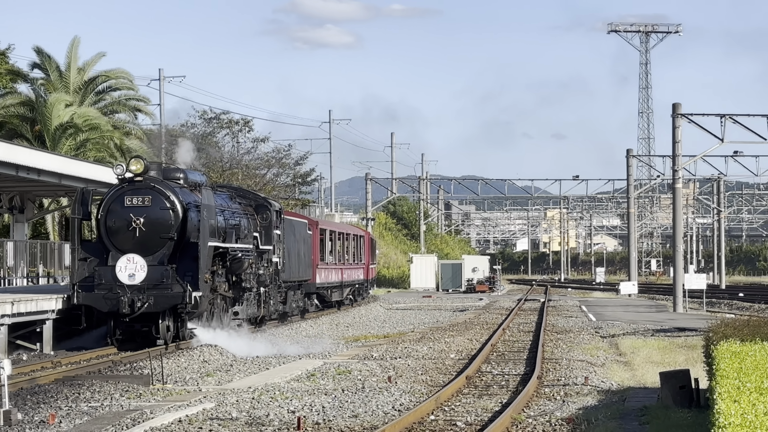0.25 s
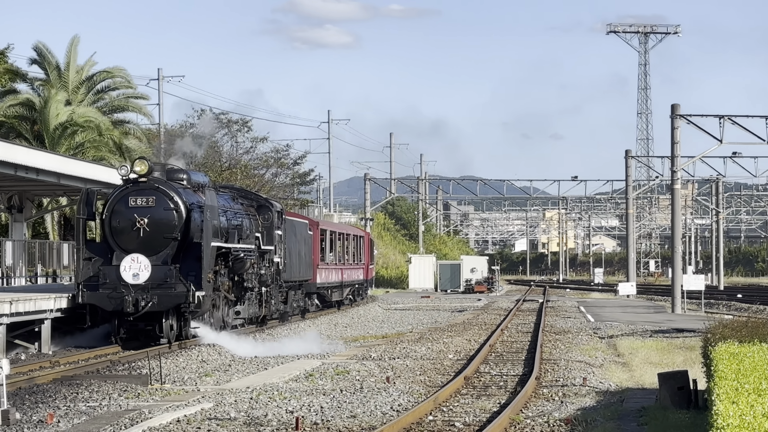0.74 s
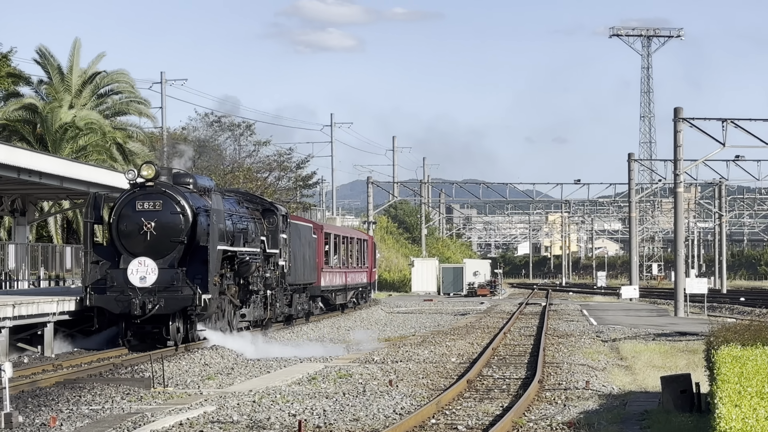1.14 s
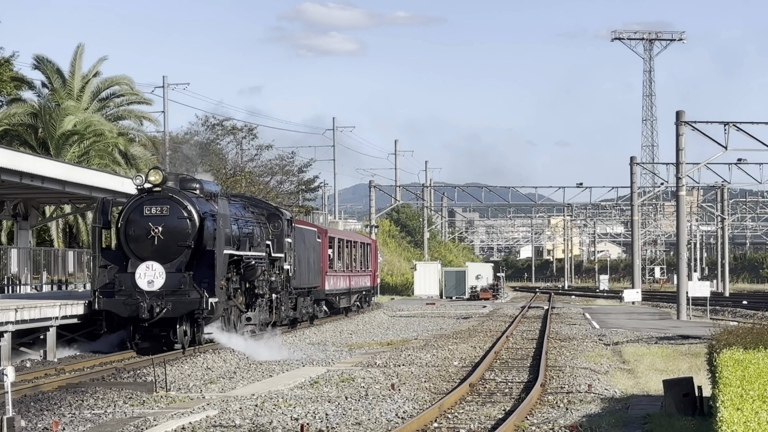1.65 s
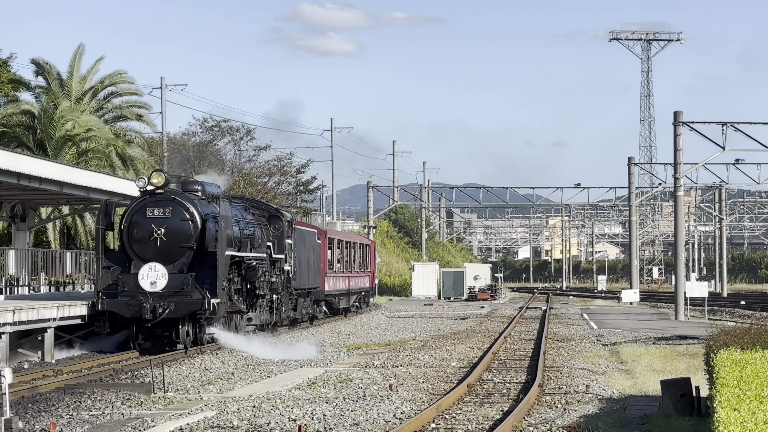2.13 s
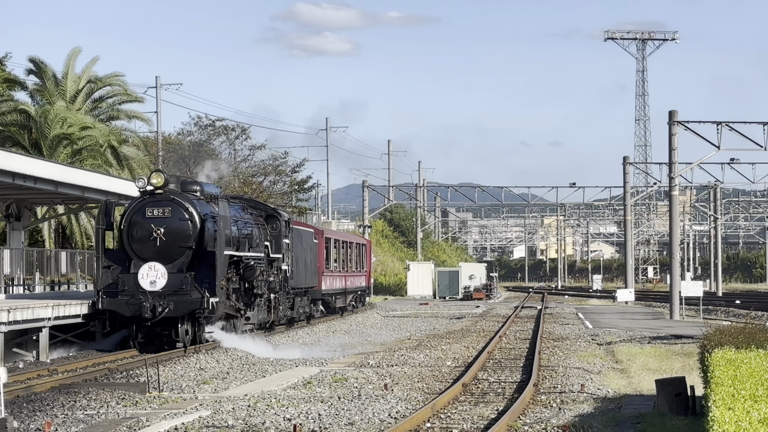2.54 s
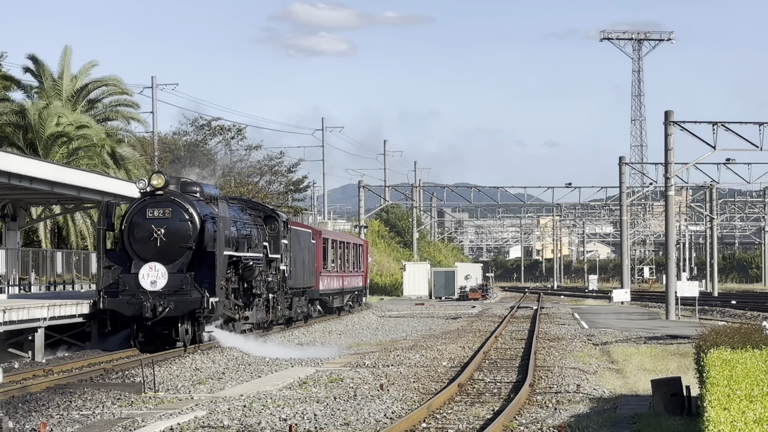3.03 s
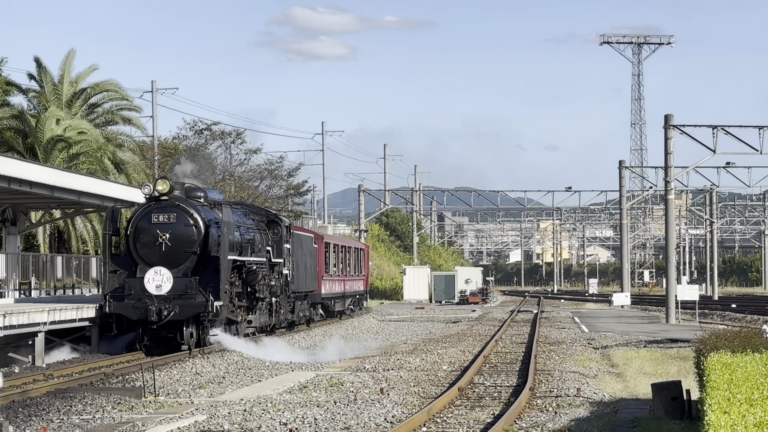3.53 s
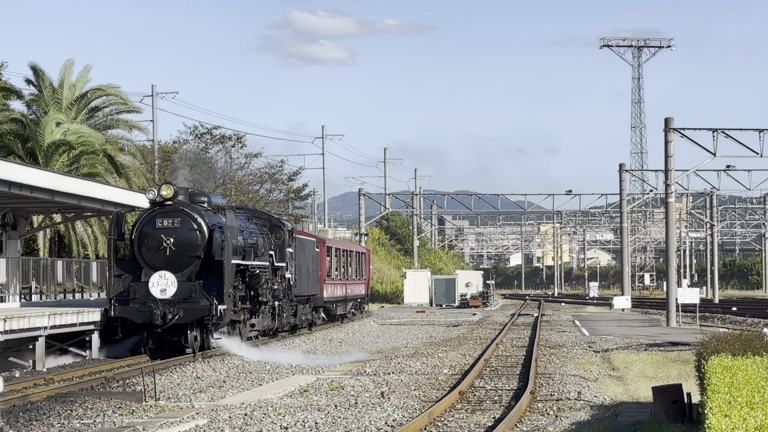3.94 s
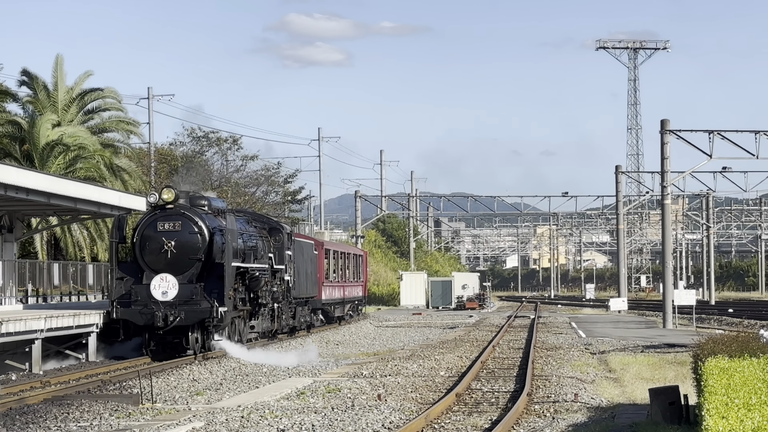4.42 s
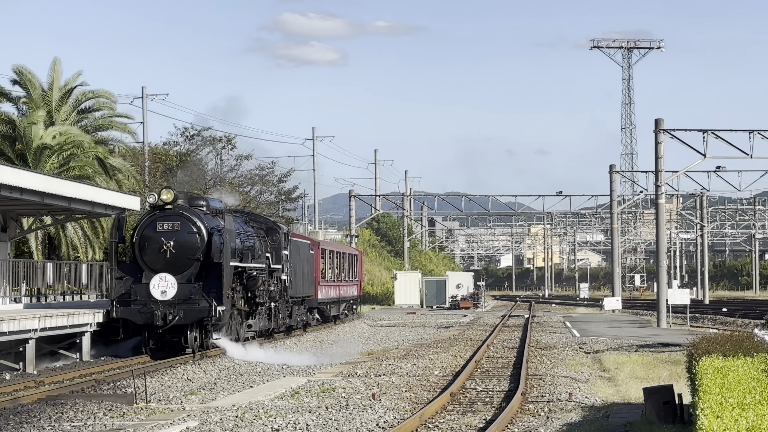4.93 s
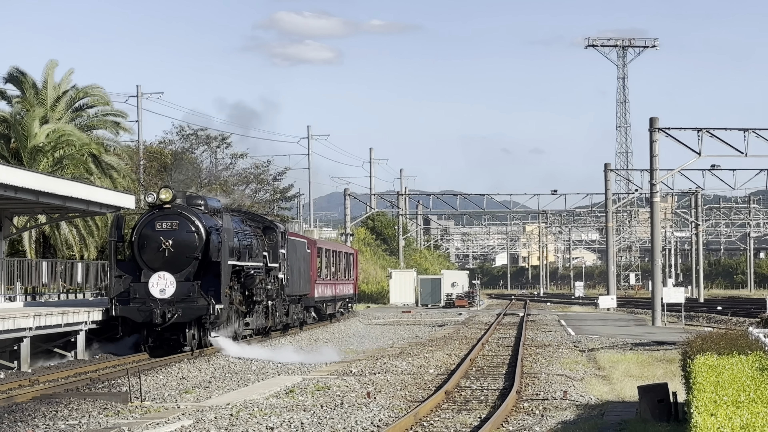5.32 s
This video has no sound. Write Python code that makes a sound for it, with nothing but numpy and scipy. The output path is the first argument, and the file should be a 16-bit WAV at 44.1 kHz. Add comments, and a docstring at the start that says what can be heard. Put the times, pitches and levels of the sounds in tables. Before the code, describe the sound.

Heard from across the tracks in an open station yard, steam escapes in an unbroken hiss, rich in upper mids and treble, gently uneven. Soft, irregular wind knocks give way to a calmer middle with one barely audible distant chirp, then heavy low gusts buffet the unprotected stereo microphone until the cut. A dim, even rumble stays underneath.

```python
"""A standing steam locomotive vents steam from its cylinder cocks, heard across the tracks of a station yard.
The jet is shaped noise: a steady hiss with brief spurts of fine spray, its tone bands swelling and sinking.
A breeze thumps on the microphone in ever stronger gusts: sharp pushes of air, small eddies and a deep wake.
Behind them lie a low rumble, made of dark noise, and one faint, far chirp, a sine that slides down."""
import sys
import numpy as np
from scipy import signal
from scipy.fft import rfft, irfft
from scipy.io import wavfile
from scipy.ndimage import uniform_filter1d

SR = 44100
rng = np.random.default_rng(int(sys.argv[2]) if len(sys.argv) > 2 else 0)


def unload_audio(sound):
    """Save the sound as a 16-bit wav file, at the path given as the first command line argument."""
    columns = np.transpose(np.atleast_2d(sound))
    # keep every value between -1 and 1, then stretch to whole-number steps
    steps = np.round(np.clip(columns, -1, 1) * 32767)
    wavfile.write(sys.argv[1], SR, steps.astype(np.int16))


N = 245725  # length in samples

# Large eddies of wind that thump on the microphone. Each row: time in seconds, level in dB,
# frequency in Hz that sets the range of its tones, roughness from 0 (one sharp push) to 1 (all flurry).
EDDIES = [(.004, -33, 110, .4), (0.033, -33, 140, 0.4), (0.064, -31, 190, 0.5), (.075, -21.5, 140, 0.2),
          (.324, -35, 280, 0.6), (.485, -33, 150, 0.46), (.709, -33, 310, 0.35), (.722, -27, 330, .45),
          (.738, -26, 350, .45), (0.751, -22, 320, 0.42), (.776, -23.5, 180, 0.35), (.845, -34, 340, 0.36),
          (.865, -31.5, 260, 0.4), (0.959, -32.5, 230, 0.4), (.995, -32, 220, .5), (1.100, -27.5, 400, 0.3),
          (1.116, -26, 260, .4), (1.425, -34, 260, 0.4), (1.444, -26, 190, 0.4), (1.463, -22, 215, 0.15),
          (1.556, -24.5, 235, .3), (1.567, -28, 225, .4), (2.025, -32.5, 300, 0.7),
          (2.041, -28.5, 342, 0.4), (2.099, -27.5, 219, 0.38), (2.185, -28, 380, .5),
          (2.204, -24.5, 220, 0.38), (2.308, -35, 280, 0.56), (2.466, -25.5, 305, 0.42),
          (2.581, -29, 169, 0.3), (2.598, -24, 236, 0.34), (2.725, -33.5, 360, .4), (3.179, -31, 260, 0.6),
          (3.230, -35, 220, 0.45), (3.322, -36, 280, 0.6), (3.596, -24.5, 230, 0), (3.61, -19, 314, 0.52),
          (3.622, -15, 161, 0.2), (3.642, -25, 230, 0.2), (3.661, -23, 258, 0.45), (3.675, -22, 220, 0.2),
          (3.79, -19, 250, 0.42), (3.820, -17, 170, 0.4), (3.832, -13, 297, .35), (3.847, -11.5, 232, 0.47),
          (3.869, -14, 262, 0.6), (3.886, -18.5, 211, 0.55), (3.899, -15.5, 270, 0.4),
          (3.948, -18.5, 320, 0.37), (3.962, -17.5, 268, .45), (3.982, -28, 220, 0.5),
          (4.169, -25.5, 230, 0.65), (4.185, -23, 220, 0.63), (4.225, -29.5, 288, 0.64),
          (4.274, -17, 290, 0.25), (4.298, -29, 230, 0.6), (4.325, -31, 240, 0.4), (4.357, -30, 170, 0.44),
          (4.400, -29.5, 226, 0.32), (4.550, -20, 332, 0.4), (4.563, -17, 282, 0.48),
          (4.59, -22, 500, 0.56), (4.603, -16, 395, 0.4), (4.618, -21.5, 420, 0.5),
          (4.630, -21.5, 390, 0.37), (4.648, -24.5, 300, 0.53), (4.717, -19.5, 356, .4),
          (4.732, -18, 280, 0.54), (4.788, -20, 160, 0.3), (4.802, -22.5, 229, 0.44),
          (4.923, -15, 310, 0.31), (4.947, -20.5, 338, 0.5), (4.964, -24.5, 320, .45),
          (5.027, -28, 240, 0.4), (5.067, -24, 258, 0.37), (5.079, -22, 342, 0.34), (5.127, -24, 240, 0.6),
          (5.212, -12, 240, 0.42), (5.228, -10.5, 406, 0.17), (5.245, -18, 75, 0.35),
          (5.295, -23, 450, 0.54), (5.303, -13.5, 360, 0.14), (5.328, -13, 362, 0.3), (5.337, -22, 80, 0.4),
          (5.371, -18, 340, 0.23), (5.383, -21, 290, 0.5), (5.391, -17, 70, .3), (5.459, -14, 300, 0.4),
          (5.471, -12, 374, 0.2), (5.477, -9, 270, 0.3), (5.490, -5, 365, 0.17), (5.494, -10, 95, .2),
          (5.507, -17, 240, 0.4), (5.523, -19.5, 310, .3), (5.550, -25, 220, .5)]


def amp(db):
    """Turns decibels into a gain."""
    return 10 ** (np.asarray(db) / 20)


def unit(x):
    """Scales a signal to an rms (average strength) of 1."""
    return x / np.sqrt(np.mean(x ** 2) + 1e-20)


def read(points, hz):
    """Reads a curve of (Hz, value) points, with straight lines between them on a log-frequency axis."""
    f, value = np.transpose(points)
    return np.interp(np.log(hz + 1), np.log(f + 1), value)


def add(mix, s, sound):
    """Mixes a stereo sound in at time s, or at the very start if s is negative."""
    start = max(round(s * SR), 0)
    part = mix[:, start:][:, :sound.shape[1]]
    part += sound[:, :part.shape[1]]


def grid(size):
    """Gives the frame times (s) and bin frequencies (Hz) of short-time spectra, four frames to a window."""
    hop = size // 4
    times = np.arange(N // hop + 5) * hop / SR
    return times, np.fft.rfftfreq(size, 1 / SR)


def drift(shape, size):
    """Makes smooth random ups and downs of rms 1, in patches of size (frames, bins)."""
    noise = rng.standard_normal(shape)
    along_time = uniform_filter1d(noise, size[0], axis=0)
    return unit(uniform_filter1d(along_time, size[1], axis=1))


def steam(patchy_db=0.33, flutter_db=0.37, spit_db=0.27, grain_db=2.28, ripple_db=1.28, wander_db=1.26):
    """Turbulent jet: its registers swell and sink, and water in the steam makes the top sputter."""
    level = -26  # dB
    # Average tone colour of the jet. Each row: frequency in Hz, relative level in dB per Hz.
    hiss = [(600, -17), (1300, -10.7), (1550, -7), (1800, -2.2), (2300, -1.8), (2900, .5), (4600, -3.8),
            (5900, 0), (7400, -.6), (8900, -6), (10900, -5.3), (11700, -7.7), (13200, -6.2), (15500, -11.5)]
    # Faint whistles within the hiss. Each row: frequency in Hz, width in Hz, rise over the hiss in dB.
    whistles = [(5882, 40, 2.8), (8095, 90, 1.5)]
    # Frequencies in Hz where the low body, roar, bright sizzle and fizz (fine spray) each rule.
    zones_hz = [1700, 2960, 6100, 12400]
    # Rise and fall of these four registers. Each row: time in seconds, level in dB (its average is removed).
    body = [(0, -41.5), (.45, -42), (1.0, -41), (1.15, -44), (2.1, -40.5), (2.45, -42), (3.1, -41),
            (3.55, -37.5), (3.95, -40.5), (4.28, -47), (4.6, -39.5), (4.78, -44.5), (5.15, -46.5),
            (5.57, -44)]
    roar = [(0, -30), (.3, -30), (.48, -28), (.7, -29.5), (1.0, -29), (1.14, -30), (1.3, -28), (1.5, -30),
            (1.7, -28.4), (1.9, -31), (2.1, -28.5), (2.55, -33), (2.72, -29.5), (3.1, -32), (3.35, -29),
            (3.65, -29), (4.05, -32.5), (4.22, -30.5), (4.78, -36), (5.0, -32.5), (5.38, -36.5),
            (5.57, -36)]
    sizzle = [(.04, -27.5), (.3, -32), (.52, -29), (.73, -31.5), (.82, -30.5), (1.0, -28), (1.15, -30),
              (1.8, -28), (2.0, -30.5), (2.45, -30), (2.63, -33), (2.72, -29.5), (2.85, -30), (2.93, -34.5),
              (3.3, -30.5), (3.48, -32.5), (3.65, -29.5), (4.3, -33), (4.72, -33.5), (4.86, -33),
              (5.25, -35), (5.39, -38.3), (5.57, -36)]
    fizz = [(0, -42.5), (.62, -40), (.9, -40), (1.12, -44.5), (1.25, -38), (1.5, -43.5), (2.15, -38.5),
            (2.9, -44.5), (3.6, -41.5), (4.35, -46), (4.75, -48), (5.05, -43), (5.36, -47.5), (5.57, -47)]
    # Brief spurts of spray. Each row: middle in seconds, length in seconds, rise of the fizz in dB.
    spurts = [(0.04, 0.34, 10.5), (0.784, 0.087, 6), (0.975, 0.18, 10), (3.0, 0.033, 5)]

    t, hz = grid(size=1024)
    field_db = read(hiss, hz)
    for f, width, db in whistles:
        field_db = field_db + db / (1 + (2 * (hz - f) / width) ** 2)

    spurt_db = sum(db / (1 + (2 * (t - middle) / length) ** 4) for middle, length, db in spurts)
    registers = [body, roar, sizzle, fizz]
    # each row of the identity picks one zone, so a register fades out towards its neighbours
    for zone, curve, lift_db in zip(np.eye(len(registers)), registers, [0, 0, 0, spurt_db]):
        level_db = (np.interp(t, *np.transpose(curve)) + lift_db)[:, None]
        field_db = field_db + (level_db - level_db.mean()) * np.interp(hz, zones_hz, zone)

    # random unevenness: soft patches, narrow streaks, and shared flicker
    shape, per_frame = field_db.shape, (len(t), 1)
    patches = patchy_db * drift(shape, size=(12, 14))
    grain = grain_db * drift(shape, size=(12, 2))
    ripple = ripple_db * drift(shape, size=(70, 1))
    flutter = flutter_db * drift(per_frame, size=(4, 1))
    # these two grow with frequency
    sputter = spit_db * drift(shape, size=(2, 120)) * hz / hz[-1] * 2
    wander = wander_db * drift(per_frame, size=(14, 1)) * (hz / zones_hz[-1]) ** 2
    uneven_db = patches + grain + ripple + flutter + sputter + wander
    return amp(level) * airborne(field_db + uneven_db, hz)


def airborne(field_db, hz):
    """Makes noise with the given level over frames and bins, as two microphone ports pick it up."""
    # Each row: frequency in Hz, phase in radians by which the left port leads.
    phase_lead = [(100, 0), (1300, -.45), (1900, 0), (2950, .6), (3350, .55), (3900, 0), (6250, 0),
                  (6850, .35), (7450, 3.14), (8000, 5.9), (8850, 6.2), (10400, 3.14), (11800, 3.1),
                  (13800, 0)]
    # Each row: frequency in Hz, likeness of left and right from 0 to 1.
    likeness = [(100, .88), (1150, .72), (1550, .15), (1850, .98), (3100, .91), (4100, .998), (6200, .998),
                (7000, .8), (7350, .99), (7450, 1), (7550, .99), (7900, .74), (8500, .98), (9600, .69),
                (10450, .998), (11700, .998), (12600, .73), (14000, .995)]
    shape = (2, *field_db.shape)
    left, other = rng.standard_normal(shape) + 1j * rng.standard_normal(shape)
    same = np.clip(read(likeness, hz), 0, 1)
    right = same * left + np.sqrt(1 - same ** 2) * other
    right = right * np.exp(-1j * read(phase_lead, hz))
    spectra = (np.array([left, right]) * amp(field_db)).swapaxes(1, 2)
    size = 2 * (len(hz) - 1)
    sound = signal.istft(spectra, nperseg=size, noverlap=size * 3 // 4)[1]
    return unit(sound[:, :N])


def eddies(spread_s=0.009, edge_ratio=1.774, floor_ratio=0.14, left_db=0.26):
    """Each large eddy is one sharp push inside a short flurry of turbulence; rough ones are mostly flurry."""
    out = np.zeros((2, N))
    count, middle = 8192, 1024  # samples: length of a thump, place of its push
    span = .005 * SR  # a thump's level is its energy spread over 5 ms
    t = (np.arange(count) - middle) / SR
    flurry = np.exp(-.5 * (t / spread_s) ** 2)
    flurry /= np.linalg.norm(flurry)
    for s, db, hz, rough in EDDIES:
        rough = np.clip(rough, 0, 1)
        rough_push = rough * turbulence(count, apart=0.7) * flurry
        sharp_push = (1 - rough) * rng.choice([-1, 1]) * (t == 0)  # towards or away, at random
        thump = pressure(rough_push + sharp_push, edge_ratio * hz, floor_ratio * hz)
        strength = np.sqrt((thump ** 2).mean(0).sum() / span)
        add(out, s + t[0], thump * amp(db) / strength)
    return out * amp([[left_db], [-left_db]])  # slightly stronger on the left


def breeze():
    """Small eddies of the steady breeze and of each gust, and the deeper wake that follows the gusts."""
    # The breeze between gusts. Each row: time in seconds, strength in dB before the ceiling.
    steady = [(0, -31), (.13, -55), (.3, -45), (.9, -47.5), (1.55, -42.5), (1.8, -54), (2.1, -41.5),
              (3.0, -47.5), (3.5, -42), (4.45, -48.5), (5.1, -38.5), (5.57, -31)]
    # Small eddies around each thump: rise in seconds, fall in seconds, strength in dB against the thump.
    swell = (0.021, 0.034, -16.5)
    # Deep flutter that lingers behind it: rise in seconds, fall in seconds, strength in dB against the thump.
    wake = (0.007, 0.075, -15.5)
    t, _ = grid(size=512)
    steady_strength = amp(np.interp(t, *np.transpose(steady)))
    small_strength = np.hypot(steady_strength, gusting(t, *swell))
    small = buffeting(small_strength, ceiling_db=-21, lumpy_db=4.0, edge_hz=300)
    deep = buffeting(gusting(t, *wake), ceiling_db=-32.5, lumpy_db=1.5, edge_hz=113)
    return small + deep


def gusting(t, rise_s, fall_s, share_db):
    """Strength of the air stirred by the large eddies: each lifts it quickly, and it dies away."""
    power = 0
    for s, db, _, _ in EDDIES:
        before = np.maximum(s - t, 0) / rise_s
        after = np.maximum(t - s, 0) / fall_s
        power = power + (amp(db + share_db) * np.exp(-before - after)) ** 2
    return np.sqrt(power)


def buffeting(strength, ceiling_db, lumpy_db, edge_hz):
    """Lumpy wind noise that follows a strength given per frame and levels off softly under a ceiling."""
    t = np.arange(N) / SR
    frames, _ = grid(size=512)
    lumps = np.interp(t, frames, drift((len(frames), 1), size=(5, 1))[:, 0])
    push = turbulence(N, apart=.3) * amp(lumpy_db * lumps)
    air = unit(pressure(push, edge_hz, floor_hz=18))
    gust = np.interp(t, frames, strength)
    return air * gust / np.hypot(1, gust / amp(ceiling_db))


def turbulence(count, apart):
    """Random pushes of air, mostly common to both ports."""
    common, difference = rng.standard_normal((2, count))
    return np.array([common + apart * difference, common - apart * difference])


def pressure(push, edge_hz, floor_hz, steepness=2.15, swirl=1.3):
    """Turns pushes of air into wind noise; the low tones lag, so each thump falls in pitch."""
    # Colour of wind noise in the microphone. Each row: frequency in Hz, relative level in dB per Hz.
    wind_colour = [(15, -24), (30, -14.5), (55, 0), (90, -0.5), (180, -3.5), (370, -3), (700, -4.5),
                   (1200, 0.5), (1700, -11), (3000, -63)]
    hz = np.fft.rfftfreq(push.shape[1], 1 / SR)
    below_edge = np.exp(-(hz / edge_hz) ** steepness)
    above_floor = hz / np.hypot(hz, floor_hz)
    colour = amp(read(wind_colour, hz)) * below_edge * above_floor
    lag = np.exp(-2j * np.pi * swirl * np.log(hz + 10))  # each tone is late by about `swirl` of its cycles
    return irfft(rfft(push) * colour * lag, push.shape[1])


def rumble(patchy_db=0.5):
    """The low, even sound of the boiler and the yard: dark noise with slight, slow unevenness."""
    level = -45.5  # dB
    # Tone colour of the rumble. Each row: frequency in Hz, relative level in dB per Hz.
    low_colour = [(18, -33), (27, -22), (38, -37), (58, 13.5), (100, -15), (160, -18.5), (310, -11.5),
                  (520, -12), (800, -10.5), (1200, -13), (2200, -26.5)]
    t, hz = grid(size=4096)
    patches = patchy_db * drift((len(t), len(hz)), size=(20, 3))
    return amp(level) * airborne(read(low_colour, hz) + patches, hz)


def chirp():
    """A faint, far whistle: a sine that slides down, slowly at first, with soft ends."""
    # One call: start in seconds, length in seconds, first frequency in Hz, last frequency in Hz, peak in dB.
    far_call = (1.64, .16, 1675, 1565, -47)
    s, length_s, from_hz, to_hz, level_db = far_call
    u = np.linspace(0, 1, round(length_s * SR))
    hz = from_hz + (to_hz - from_hz) * u ** 2
    tone = np.sin(2 * np.pi * np.cumsum(hz) / SR)
    tone = tone * signal.windows.tukey(len(u), .5)
    out = np.zeros((2, N))
    add(out, s, amp(level_db) * np.array([tone, tone]))
    return out


def scene():
    """Locomotive and yard, with the wind on the microphone."""
    return steam() + rumble() + chirp() + breeze() + eddies()


def record(dry):
    """Limits the band as the recorder does: a steep low-pass filter removes the highest treble."""
    cutoff_hz = 15750
    low_pass = signal.firwin(1023, cutoff_hz, window=("kaiser", 9), fs=SR)
    return signal.oaconvolve(dry, low_pass[None], "same")


dry = scene()
out = record(dry)
unload_audio(out)
```